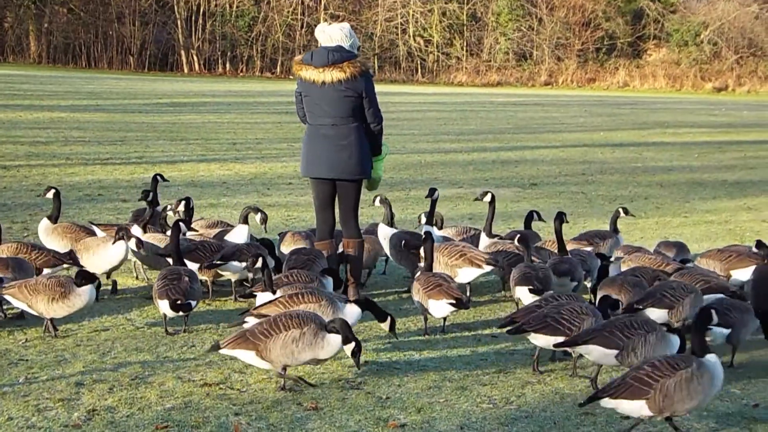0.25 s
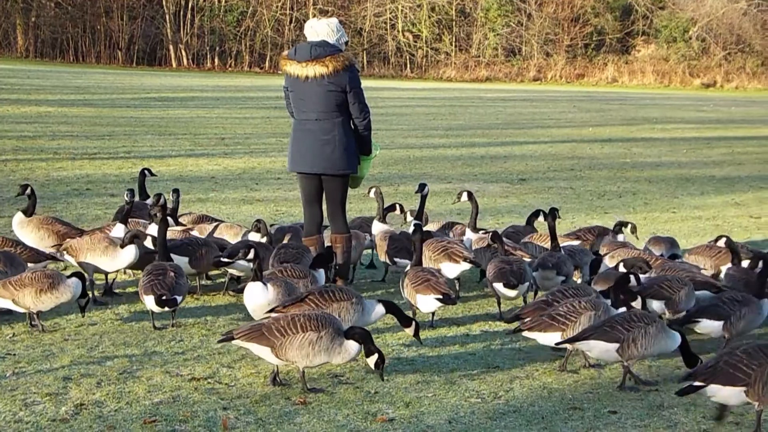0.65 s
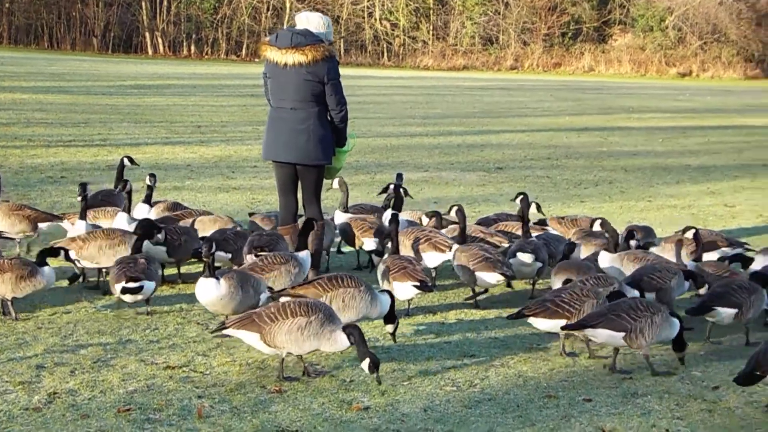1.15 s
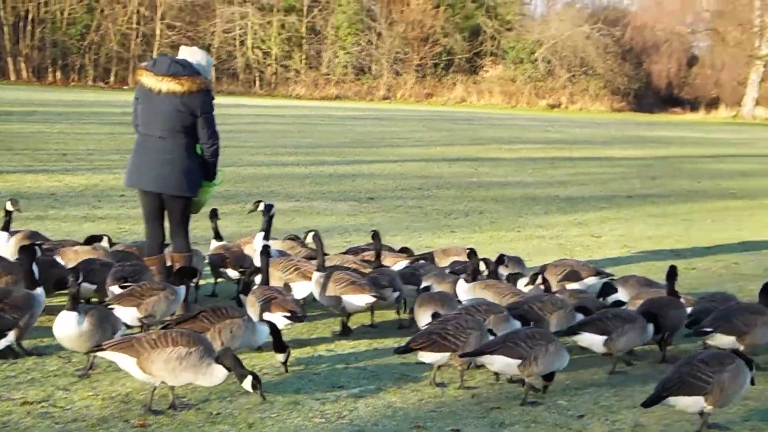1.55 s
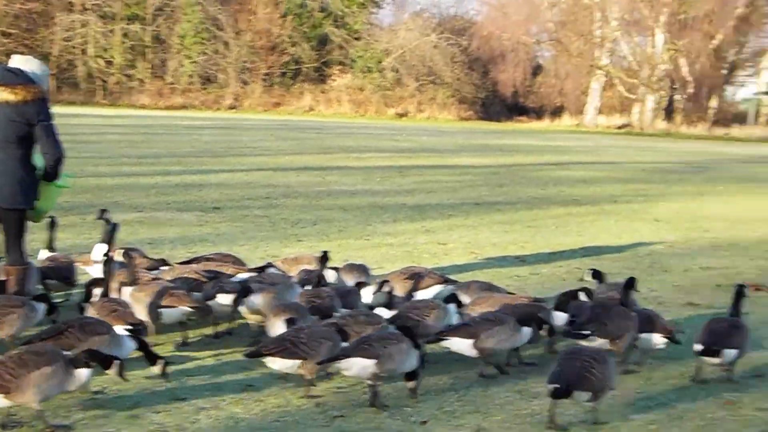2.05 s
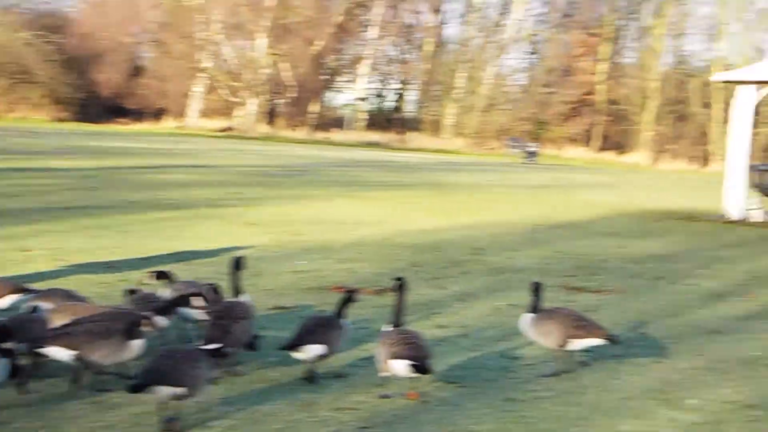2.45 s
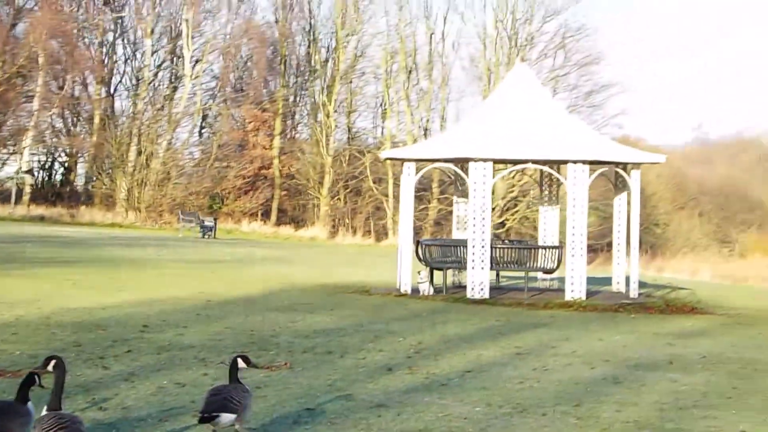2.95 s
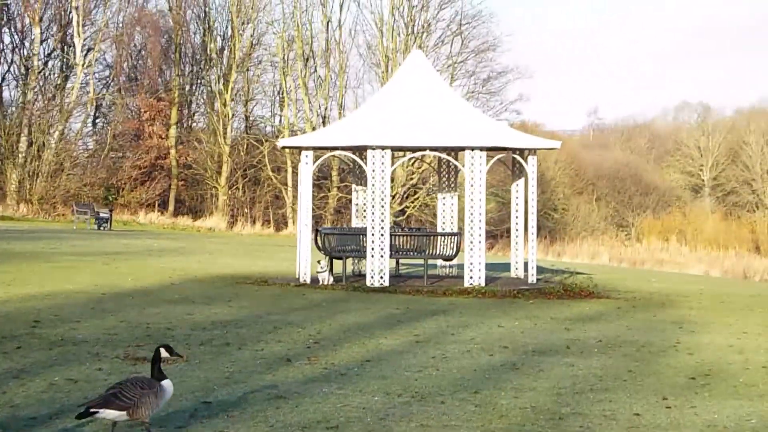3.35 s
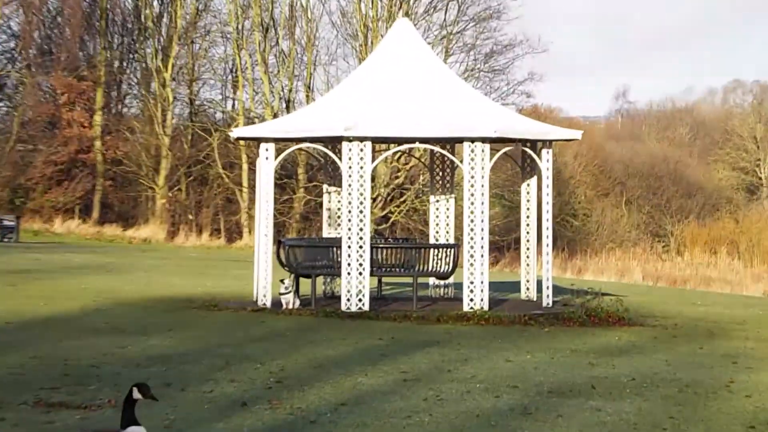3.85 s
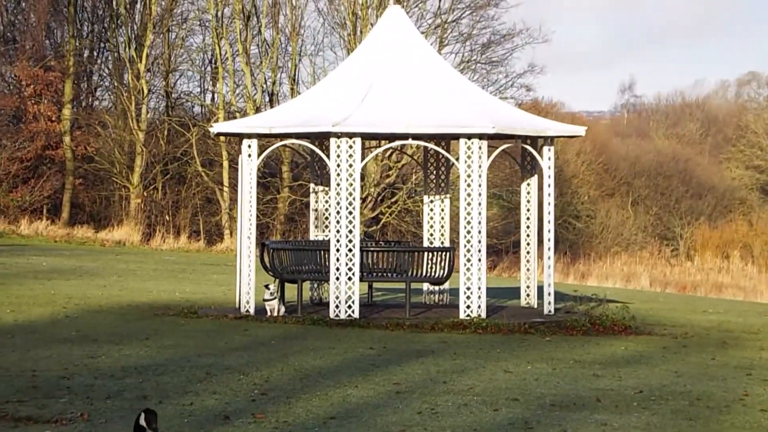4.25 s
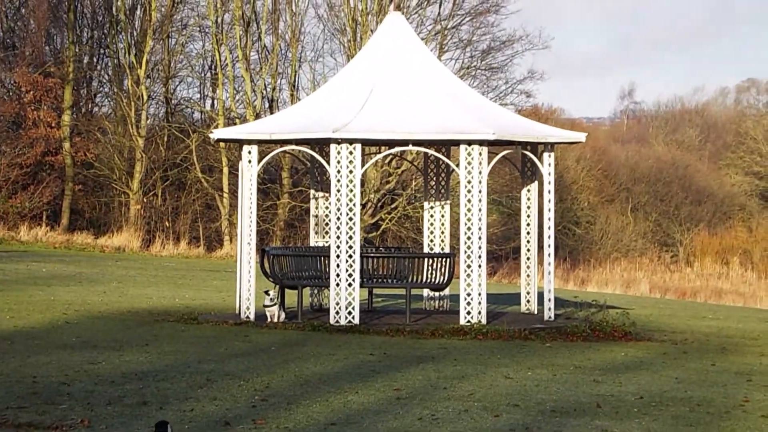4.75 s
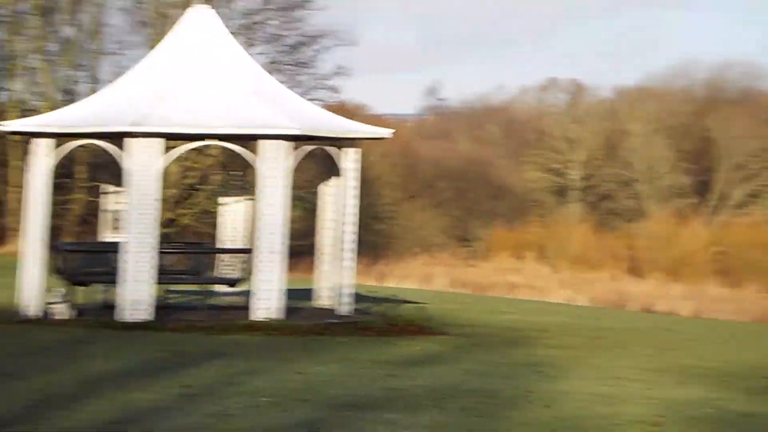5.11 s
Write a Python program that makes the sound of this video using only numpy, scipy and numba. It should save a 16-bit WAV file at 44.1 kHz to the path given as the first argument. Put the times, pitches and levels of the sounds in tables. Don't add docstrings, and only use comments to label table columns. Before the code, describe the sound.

A small stereo camera a few metres from a flock catches dry pecking and grass-tearing ticks, a quick rising creak breaking into a yelp, and later a pair of rough, short honks. Far traffic washes steadily beneath. Then the camera itself intrudes: faint airy whir, sharp plastic tick, bright gritty zoom hiss, end-stop rattle. Afterwards only road roar and a low distant engine remain, with a last faint hiss.

```python
import sys
import numpy as np
from scipy import signal
from scipy.fft import rfft, irfft, next_fast_len
from scipy.io import wavfile
from scipy.ndimage import uniform_filter1d
from numba import njit

SR = 44100
rng = np.random.default_rng(int(sys.argv[2]) if len(sys.argv) > 2 else 0)


def int16_out(signal):
    q = np.round(np.clip(np.atleast_2d(signal).T, -1, 1) * 32767)
    wavfile.write(sys.argv[1], SR, q.astype(np.int16))


def decibels_to_gain(level_db):
    exponent = np.asarray(level_db, float) / 20
    return 10 ** exponent


N = 237147
PADDED = next_fast_len(N)
T = np.arange(N) / SR
F = np.arange(PADDED // 2 + 1) * SR / PADDED
PORT_LAG, LEFT_DB = 0.8, 1.1
IN_STEP_HZ = 7600


def unit(x):
    return x / np.sqrt(np.mean(x ** 2))


def read(table, t=T):
    s, *columns = np.transpose(table)
    return [np.interp(t, s, c) for c in columns]


def shape(points):
    hz, db = np.transpose(points)
    return decibels_to_gain(np.interp(np.log(F + 1), np.log(hz), db))


def through(x, response):
    return irfft(rfft(x, PADDED) * response, PADDED)[..., :N]


def mode(hz, width):
    return 1 / (1 + 1j * (F ** 2 - hz ** 2) / ((F + 1) * width))


def ports(x, lag, pan_db):
    lag_s = lag / SR / (1 + (F / IN_STEP_HZ) ** 8)
    right = through(x, np.exp(-2j * np.pi * F * lag_s))
    return np.array([x * decibels_to_gain(pan_db / 2), right * decibels_to_gain(-pan_db / 2)])


def walk(rate):
    k = int(SR / rate)
    held = np.repeat(rng.standard_normal(N // k + 1), k)
    return 1.277 * uniform_filter1d(uniform_filter1d(held, k), k)[:N]


@njit
def svf(x, hz, width):
    y, b, l = np.empty(len(x)), 0., 0.
    for i in range(len(x)):
        g, k = np.tan(np.pi * hz[i] / SR), width / hz[i]
        v = (b + g * (x[i] - l)) / (1 + g * (g + k))
        b, l, y[i] = 2 * v - b, l + 2 * g * v, k * v
    return y


# pitch_hz, level_db (per Hz)
ROAD_COLOUR = [(18, -54), (40, -22.5), (98, -17.5), (150, -13), (250, -9), (450, -13), (737, -3.5),
               (1010, 0.5), (1500, -3), (2300, -6.5), (3300, -14), (5400, -11.5), (9000, -31.5),
               (15900, -42)]
# pitch_hz, level_db (re the shared part)
ROAD_SIDE = [(40, -7), (120, -12), (300, -19), (1000, -20), (2400, -15), (4400, -12), (7000, -7),
             (8300, -12), (9800, -34), (15000, -40)]
# start_s, level_db
SWELL = [(0, -40.5), (.8, -40.5), (1.4, -41.5), (1.7, -40.5), (2.5, -40), (2.9, -38.5), (3.2, -40.5),
         (3.5, -39), (4.3, -38), (4.8, -39.5), (5.38, -38)]
STEADY_TREBLE, NEAR_DB = 0.82, -38.5
TURN_S, TURN_TAKES_S, TURN_DB = 3.9, 0.26, -0.5


def road():
    roar = rng.standard_normal((2, N))
    colour = shape(ROAD_COLOUR) * np.array([1 + 0 * F, shape(ROAD_SIDE)])
    db = read(SWELL)[0]
    turn_db = TURN_DB / (1 + np.exp((TURN_S - T) / TURN_TAKES_S))
    treble_db = STEADY_TREBLE * (NEAR_DB - db) + turn_db
    out, swell = 0, walk(2.01)
    for octave in range(10):
        band = np.cos(np.pi / 2 * (np.log2((F + 1) / 27.4) - octave).clip(-1, 1)) ** 2
        treble = np.clip((octave - 5) / 3, 0, 1)
        band_db = 0.71 * swell + 0.56 * walk(6.15) + treble_db * treble
        out = out + decibels_to_gain(band_db) * through(roar, colour * band)
    mid, side = out * decibels_to_gain(db) / np.sqrt(np.mean(out[0] ** 2))
    return ports(mid, PORT_LAG, LEFT_DB) + side * np.array([[1], [-1]])


# start_s, pitch_hz, level_db
DRONE = [
    (0, 232, -84),
    (1, 240, -67),
    (3.1, 256, -68),
    (3.3, 256, -63),
    (3.6, 246, -65),
    (4.2, 250, -63),
    (4.9, 250, -57.5),
    (5.2, 250, -56),
    (5.38, 250, -66),
]


def drone():
    hz, db = read(DRONE)
    phase = 2 * np.pi * np.cumsum(hz + 2.495 * walk(12)) / SR
    return np.sqrt(2) * decibels_to_gain(db + 3.1 * walk(10)) * np.sin(phase)


# start_s, peak_db, length_ms, upper_ring_db, left_minus_right_db
SNAPS = [(.339, -30.5, 5.4, 2, 0.5), (0.345, -25, 7.1, -4, -0.5), (0.352, -30, 7.5, -8, 2),
         (.372, -38, 5, 3.5, 2), (.380, -28, 6, -3, 3), (.56, -36, 6, -5, -1), (.617, -39, 5, -4, 1),
         (1.35, -37, 8, -2, 0), (2.266, -35, 4, 1, 5), (2.275, -32.5, 6.6, -2, 6),
         (2.326, -33.5, 12, -2, -0.5), (2.638, -29, 3.3, -9, 1), (3.030, -30, 2.7, -11, 0),
         (3.299, -38, 4.5, -13, 2)]
SNAP_HZ = 5390


def snaps():
    out, n = np.zeros((2, N)), 2048
    t = np.arange(n) / SR
    for s, db, ms, upper_db, pan_db in SNAPS:
        grain = decibels_to_gain(2.7 * rng.standard_normal(n // 32)).repeat(32)
        rasp = rng.standard_normal((2, n)) * np.exp(-(t / (ms / 1000)) ** 2) * grain
        rasp[1] = 0.35 * rasp[0] + 1.4 * rasp[1]
        for c in range(2):
            y = 0
            for hz, width, ring_db in [(SNAP_HZ, 2100., 0), (3700, 1600., -7.5), (7620, 620., upper_db),
                                       (11000, 5000., -22.5)]:
                centre = np.full(n, 1. * hz)
                y = y + decibels_to_gain(ring_db) * svf(svf(rasp[c], centre, width), centre, width)
            out[c, int(s * SR):int(s * SR) + n] += y / np.abs(y).max() * decibels_to_gain(db + pan_db * (1.5 - c))
    return out


def beat(hz, rough, loss):
    n = len(hz)
    chance = rng.standard_normal((n // 40, 2))
    even = np.cumsum(hz) / SR
    phase = even + 0.277 * rough * np.interp(even, np.arange(len(chance)), chance[:, 0])
    cycle = np.floor(np.maximum.accumulate(phase)).astype(int).clip(0)
    size = decibels_to_gain(8.6 * rough * chance[cycle, 1]) * (1 - loss * (cycle % 2))
    since = (phase - cycle).clip(0)
    saw = size * (1 - np.exp(-since * SR / hz / 2)) * np.exp(-since / 0.038)
    puff = size * np.exp(-since / 0.61) * rng.standard_normal(n)
    return np.diff(saw, prepend=0) * np.sqrt(SR / hz) + 3.0 * rough * puff


def honk(call, goose):
    span = slice(int(call[0][0] * SR), int(call[-1][0] * SR))
    hz, db, loss, rough, pipe_hz, bill_db = read(call, T[span])
    pipe_width, neck, bill = goose
    source = beat(hz, rough.clip(0, 1), loss.clip(0, 1))

    def ring(f, width):
        return svf(source, f + 0 * hz, 1. * width) / np.sqrt(width / pipe_width)

    drift = (pipe_hz / pipe_hz.mean()) ** 0.19
    low = ring(pipe_hz, pipe_width)
    for k, (f, width, d) in enumerate(neck):
        low = low + (-1) ** k * decibels_to_gain(d) * ring(f * drift, width)
    low = svf(low, 1150 + 0 * hz, 1700.)
    high = sum((-1) ** k * decibels_to_gain(d) * ring(f, width) for k, (f, width, d) in enumerate(bill))
    high = svf(high, 5000 + 0 * hz, 5000.)
    voice = (low + decibels_to_gain(bill_db) * high) / np.sqrt(np.mean(low ** 2))
    out = np.zeros(N)
    out[span] = uniform_filter1d(decibels_to_gain(db), size=110) * voice
    return out


ONSET_S, RELEASE_S, SWITCH_S, SILENT_DB = 0.02, 0.011, 0.0033, -58
STRETCH_HZ_PER_DB = 13
SAG_PER_S, BILL_SHUTS_DB_PER_S = 2.58, 250


def phrase(creak, crack, yelp, bird, quality):
    rest_hz, length, fade_db = bird

    def row(s, hz, db, pipe_hz, bill_db, k):
        return (s, hz, db, *quality[k], pipe_hz, bill_db)

    start, start_hz, start_db, start_bill_db = creak[0]
    rows = [row(start - ONSET_S, start_hz, SILENT_DB, rest_hz, start_bill_db, 0)]
    for k, (s, hz, db, bill_db) in enumerate(creak):
        rows.append(row(s, hz, db, rest_hz + STRETCH_HZ_PER_DB * (db - start_db), bill_db, k // 2))
    s, hz, db, pipe_hz, bill_db = yelp
    sag, shut_db = 1 - SAG_PER_S * length, bill_db - BILL_SHUTS_DB_PER_S * length
    end = s + length
    return [*rows, row(*crack, 2), row(s - SWITCH_S, crack[1], db, *crack[3:], 2), row(*yelp, -1),
            row(end, hz * sag, db + fade_db, pipe_hz * sag, shut_db, -1),
            row(end + RELEASE_S, hz * sag, SILENT_DB, pipe_hz * sag, shut_db, -1)]


# (pitch_hz, width_hz, level_db re windpipe)
GEESE = [
    (150, [(584, 93, -10), (836, 110, -4.5), (1450, 510, -4.5), (1720, 150, 0.5), (1910, 130, -7.5)], [(3800, 170, -8), (4290, 190, -5), (4780, 240, -6), (5580, 290, -5.5)]),
    (99, [(770, 190, -10), (1190, 130, -6.5), (1460, 170, -20), (1900, 80, -17)], [(3470, 460, -13.5), (4650, 300, -5), (5650, 980, -3.5), (7200, 3000, -7)]),
    (120, [(475, 130, -14), (685, 36, -13), (1107, 60, -13.5), (1660, 65, -8.5), (1790, 88, -16)], [(3620, 130, -12.5), (5120, 600, -8), (5830, 910, -7.5), (7860, 560, -20)]),
]
# start_s, pulse_rate_hz, level_db, bill_opening_db
CREAKS = [
    [(.91, 378.5, -41, -4.5), (.98, 381.3, -40, -9), (1.02, 402, -36, -18), (1.061, 421, -31.5, -13)],
    [(1.87, 150, -40.5, -11), (1.935, 168.2, -35, -13), (1.992, 157.7, -30.5, -14),
     (1.9995, 159.7, -40, -14)],
    [(2.13, 164.7, -34.5, -8), (2.165, 153.1, -38.5, -10), (2.2, 166.2, -34, 1), (2.236, 151, -31, -1)],
]
# start_s, pulse_rate_hz, level_db, windpipe_hz, bill_opening_db
BREAKS = [
    (1.067, 571, -24.5, 1435, -7),
    (2.0018, 175.4, -24.5, 1410, -11),
    (2.241, 151, -28.5, 1335, 0),
]
# start_s, pulse_rate_hz, level_db, windpipe_hz, bill_opening_db
YELPS = [
    (1.081, 595, -26, 1190, -2.5),
    (2.014, 236.5, -23, 1405, -1.5),
    (2.256, 234.5, -23, 1450, -5),
]
# resting_windpipe_hz, yelp_length_s, yelp_fade_db
BIRDS = [
    (1156, .041, -13),
    (1225, 0.015, -6.5),
    (1310, .026, -14),
]
QUALITY = [
    [(.35, .02), (1, .02), (.9, .05), (.12, .04)],
    [(.1, .08), (.25, .06), (.1, .05), (.05, .02)],
    [(.2, .16), (.2, .17), (.1, .1), (.1, .05)],
]


def geese():
    calls = zip(CREAKS, BREAKS, YELPS, BIRDS, QUALITY)
    honks = [honk(phrase(*call), goose) for call, goose in zip(calls, GEESE)]
    voices = sum(ports(h, lag, db) for h, lag, db in zip(honks, [0.1, 0.6, 0.5], [0.8, 1.2, 1.2]))
    tail = rng.standard_normal((2, 4000)) * np.exp(-np.arange(4000) / SR / 0.0098) * decibels_to_gain(-46)
    return voices + signal.fftconvolve(voices, tail, axes=1)[:, :N]


# start_s, end_s, level_db
FOCUS = [
    (2.627, 2.87, -66),
    (5.09, 5.4, -71),
]
# pitch_hz, width_hz, level_db
FOCUS_MODES = [
    (8100, 700, 1),
    (9850, 800, 3),
    (11600, 900, -4),
]
FOCUS_FADE_S = 0.06


def focus():
    response = sum(decibels_to_gain(d) * mode(f, w) ** 2 for f, w, d in FOCUS_MODES)
    hiss = through(rng.standard_normal(N), response)
    gain = 0
    for start, end, db in FOCUS:
        fade = (np.minimum(T - start, end - T) / FOCUS_FADE_S + 1).clip(0, 1)
        gain = gain + decibels_to_gain(db) * fade ** 2
    return unit(hiss) * gain


# start_s, peak_db, ring_hz
LEVER = [
    (3.3652, -21, 3024),
    (3.7635, -22, 2630),
]


def lever():
    out, t = np.zeros((2, N)), np.arange(600) / SR
    partials = [(1.02, 4.5, 0.0011, 0.8), (1.4, -10, 0.00089, -0.93), (1.9, -2.5, 0.00085, 1.2),
                (0.66, 1.5, 0.001, 0.56), (0.38, -9, 0.0022, -0.081)]
    attack = 1 - np.exp(-(t / 0.000208) ** 2)
    for s, db, hz in LEVER:
        for c in range(2):
            y = sum(decibels_to_gain(d) * np.sin(2 * np.pi * ratio * hz * t + c * lead) * np.exp(-t / tau)
                    for ratio, d, tau, lead in partials)
            out[c, int(s * SR):int(s * SR) + len(t)] += decibels_to_gain(db) * y * attack
    return out


# at_speed_s, stop_s, level_db
ZOOM = (3.456, 3.966, -36)
# centre_s, length_s (to either side), low_mode_boost_db
STOP = (3.968, 0.012, 8.2)
# pitch_hz, width_hz, level_db, left_port_lead_radians
CASE = [(3560, 870, -0.5, -0.5), (4060, 490, 6, -2.5), (4760, 610, 1.5, -0.1), (5320, 710, -1, -1.5),
        (5756, 820, -3, 1.4), (6450, 930, -11, 0), (7070, 550, -3, 1.5), (7700, 630, -5, 0.8),
        (8950, 980, -12, 0.5), (10000, 980, -18, 4), (12000, 2430, -26.5, -2)]
GEAR_HZ, GEAR_ROUGH = 250, 0.22
GEAR_SHARED = 0.65
SPIN_UP_S, KICK_DB, KICK_S, RUN_DOWN_DB_PER_S, RUN_DOWN_S = 0.016, 2.5, 0.06, 598, 0.03


def zoom():
    start, stop, run_db = ZOOM
    stop_hit, stop_length, stop_db = STOP
    span = slice(int((start - SPIN_UP_S) * SR), int((stop + RUN_DOWN_S) * SR))
    t = T[span]
    f = np.arange(len(t) // 2 + 1) * SR / len(t) + 1
    tooth_hz = GEAR_HZ * (1 + 0.132 * walk(10)[span])
    teeth = 1 + GEAR_ROUGH * np.sin(2 * np.pi * np.cumsum(tooth_hz) / SR)
    jolt_db = stop_db * np.exp(-((t - stop_hit) / stop_length) ** 2)
    rattle = 0
    for hz, width, db, lead in CASE:
        scrape = rng.standard_normal((3, len(t))) * teeth
        scrape = np.sqrt(GEAR_SHARED) * scrape[0] + np.sqrt(1 - GEAR_SHARED) * scrape[1:]
        turn = np.exp(0.5j * lead * np.array([[1], [-1]]))
        ring = turn / (1 + 1j * (f ** 2 - hz ** 2) / (f * width)) ** 2
        mode_db = db + jolt_db * (hz < 4300) + walk(40)[span] / 2
        rattle = rattle + decibels_to_gain(mode_db) * irfft(rfft(scrape) * ring, len(t))
    effort_db = KICK_DB * np.exp(-abs(t - start) / KICK_S)
    effort_db -= 35 * ((start - t) / SPIN_UP_S).clip(0)
    effort_db -= RUN_DOWN_DB_PER_S * (t - stop).clip(0)
    out = np.zeros((2, N))
    out[:, span] = unit(rattle) * decibels_to_gain(run_db + effort_db + 6)
    return out


def scene():
    far = road() + ports(drone(), 0, LEFT_DB)
    lawn = snaps() + geese()
    return far + lawn + focus() + lever() + zoom()


# start_s, end_s, level_db
DUCK = (3.435, 4.292, -3.5)


def turn_down(x):
    start, end, db = DUCK
    armed = uniform_filter1d(1. * ((T > start) & (T < end)), size=400)
    return x * decibels_to_gain(db * armed)


def band_limit(x):
    return signal.sosfilt(signal.butter(12, 15750, fs=SR, output="sos"), x)


def record(dry):
    mix = turn_down(dry)
    return band_limit(mix)


dry = scene()
out = record(dry)
int16_out(out)
```